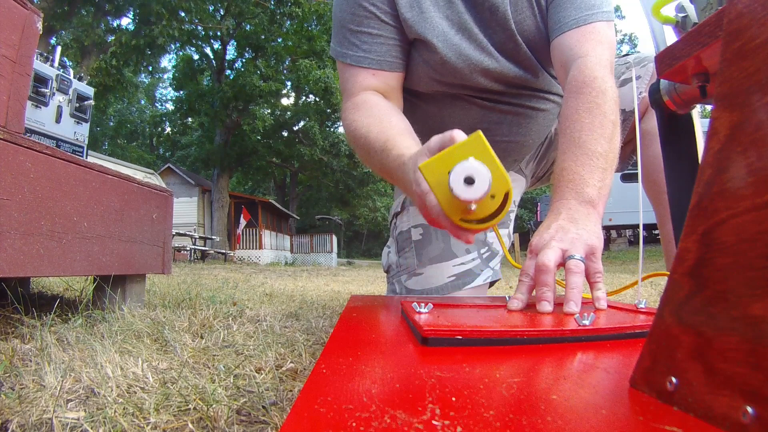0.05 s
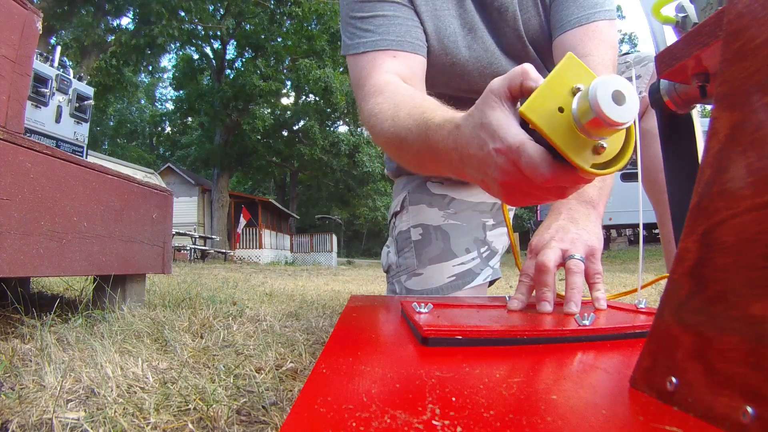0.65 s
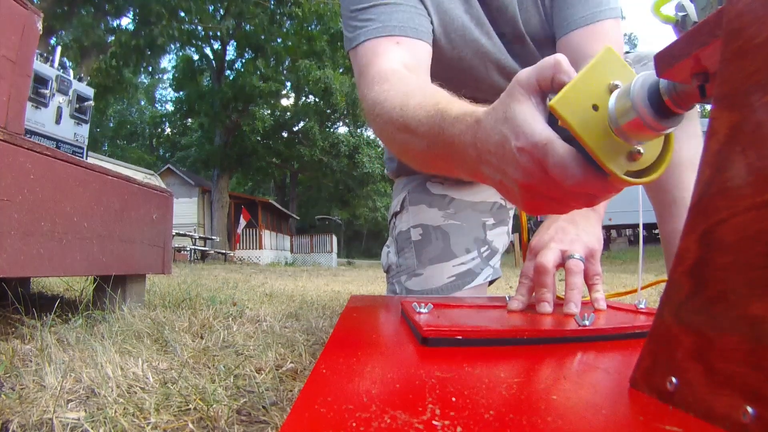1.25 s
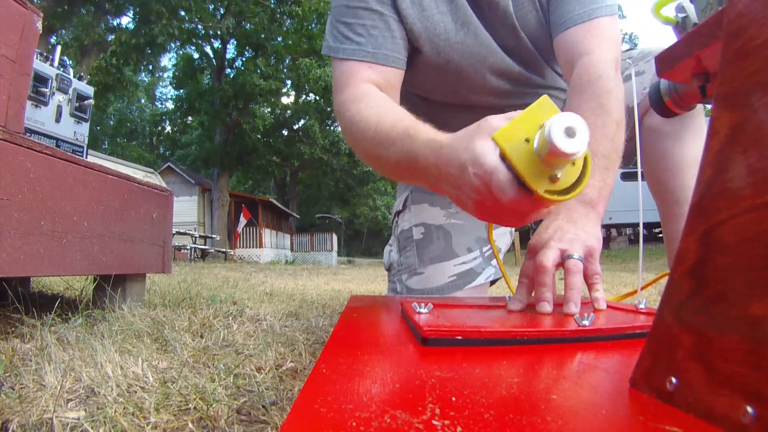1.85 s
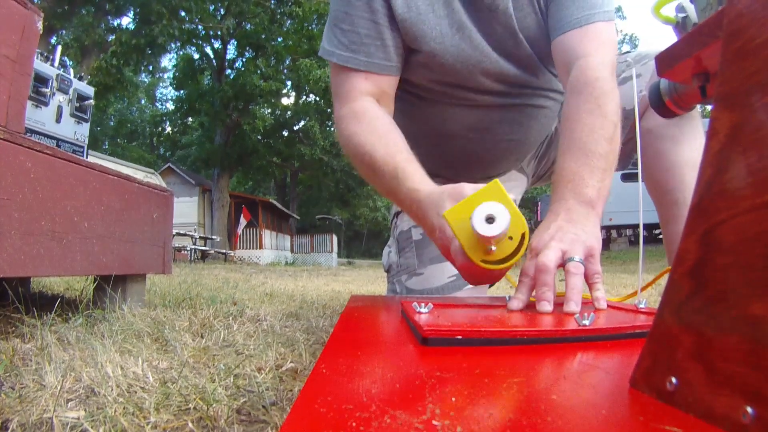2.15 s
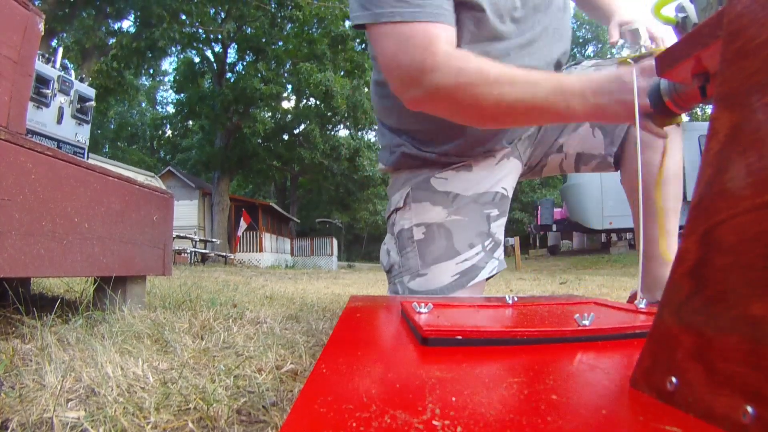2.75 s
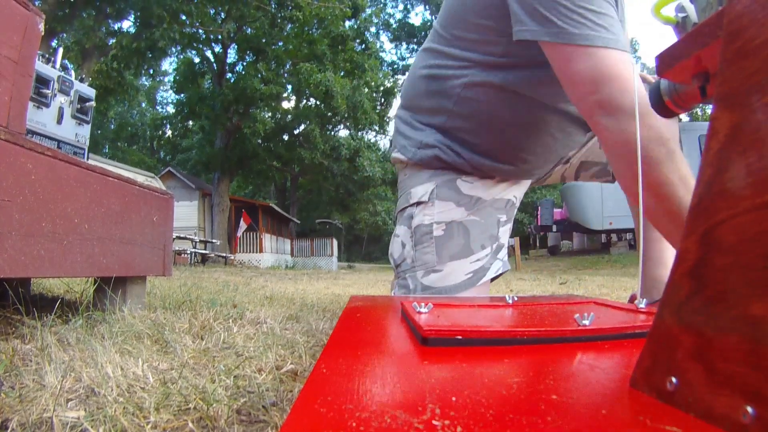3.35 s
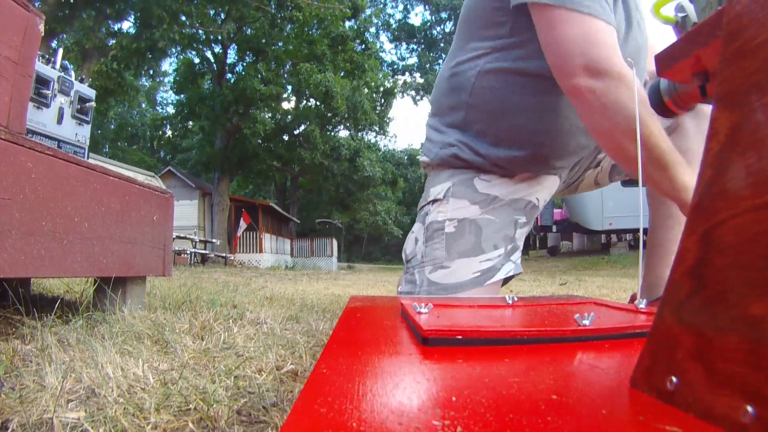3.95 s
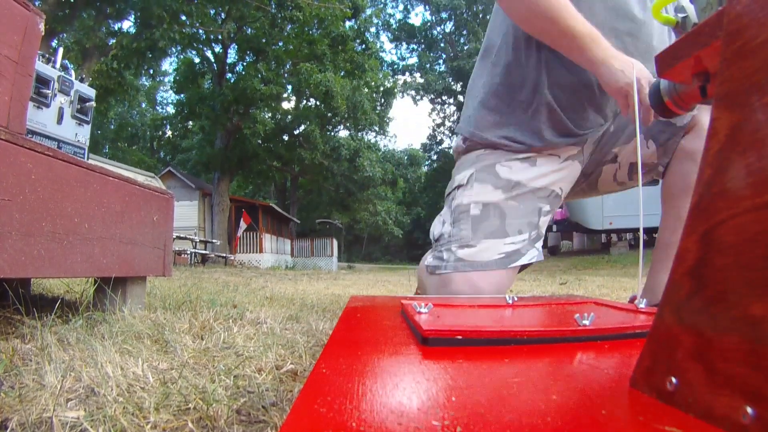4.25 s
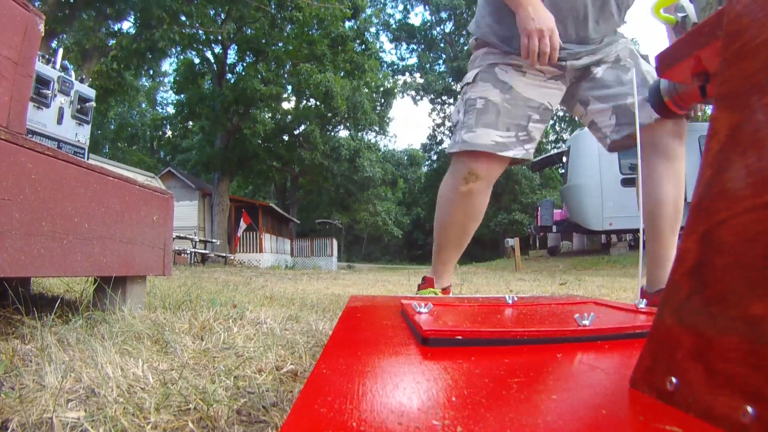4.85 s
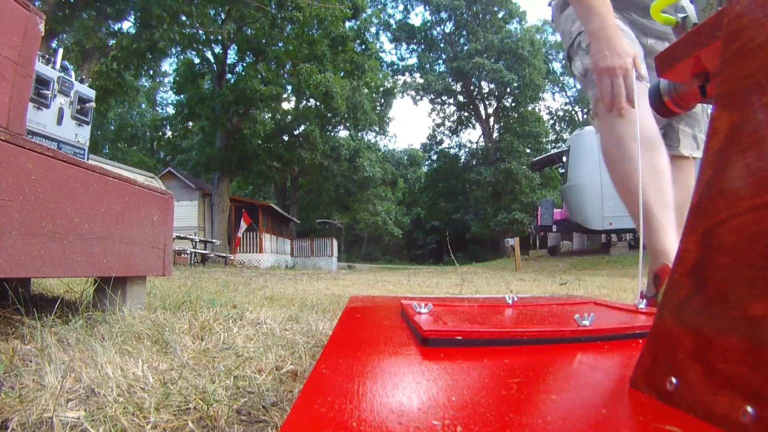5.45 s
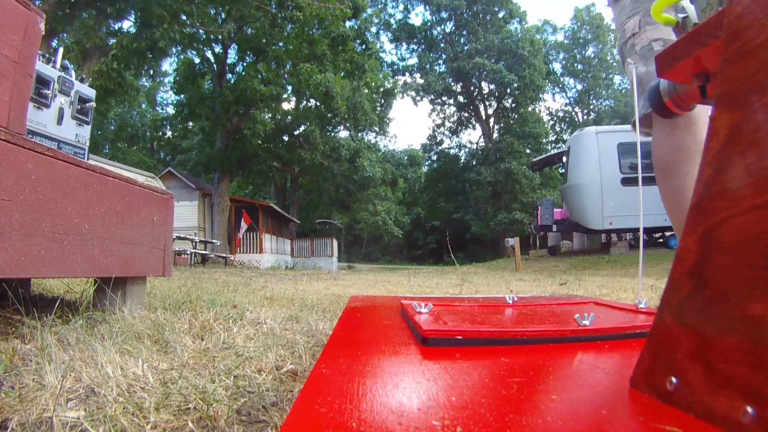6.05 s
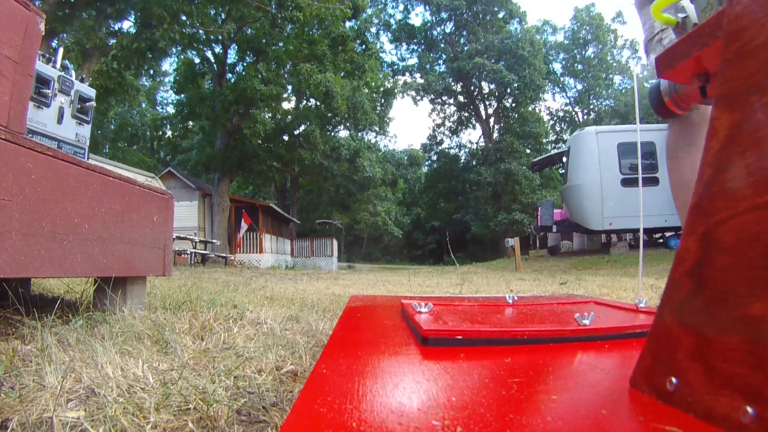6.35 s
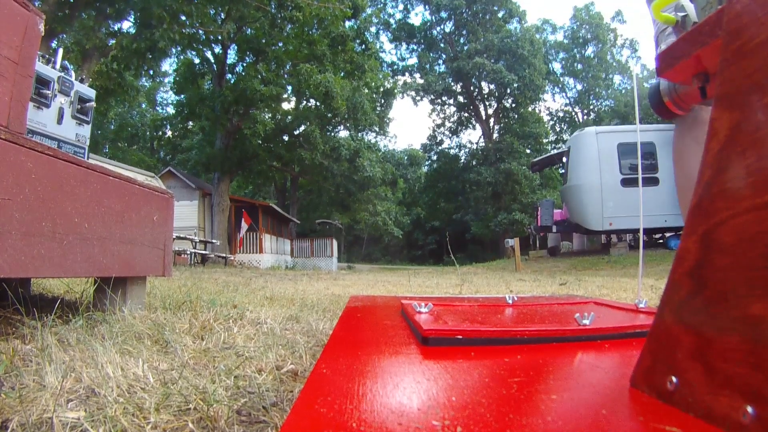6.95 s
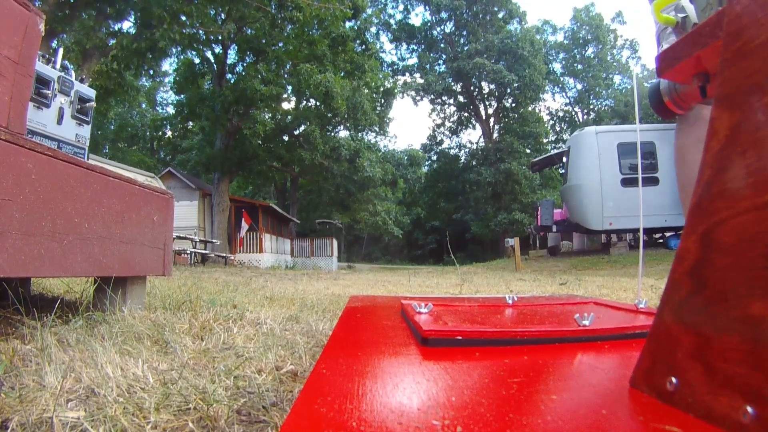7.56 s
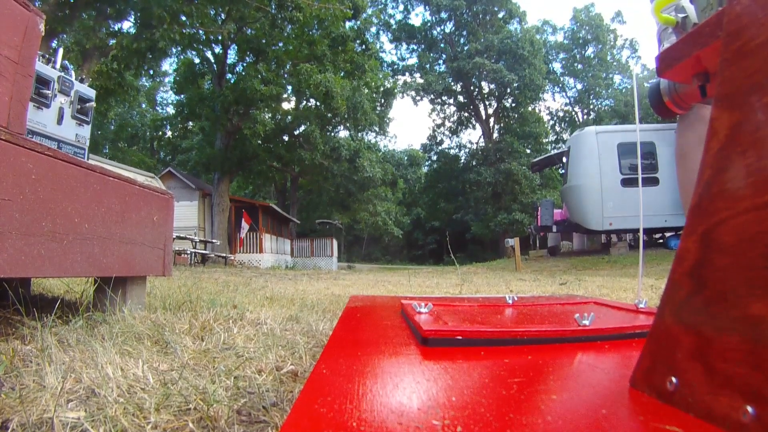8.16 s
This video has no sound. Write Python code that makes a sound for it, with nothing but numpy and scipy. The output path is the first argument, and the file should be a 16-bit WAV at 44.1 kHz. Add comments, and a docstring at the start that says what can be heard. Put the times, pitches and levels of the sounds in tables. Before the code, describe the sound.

A few knocks, a brief starter whir and thump, then a small two-stroke model boat engine revs loudly, rattling, and drops to a sputtering idle.

```python
"""A model boat's two-stroke engine is started on a lawn, with the microphone on the hull.
First, knocks excite the modes of the deck. An electric starter whirs, then grabs with a thump.
The engine catches and revs up: exhaust pulses drive the silencer's resonances, while piston knocks
and a chattering metal fitting shake the hull and overload the microphone.
Finally the engine sags to a stumbling idle, its rich mixture burning unevenly."""
import sys
import numpy as np
from scipy import signal
from scipy.fft import rfft, irfft
from scipy.io import wavfile
from scipy.ndimage import uniform_filter1d

SR = 44100
rng = np.random.default_rng(int(sys.argv[2]) if len(sys.argv) > 2 else 0)


def transcribe(signal):
    """Save signal, clipped to [-1, 1], as a 16-bit WAV file at the path in sys.argv[1]."""
    frames = np.atleast_2d(signal).T
    limited = np.clip(frames, -1, 1)
    pcm = np.round(limited * 32767).astype(np.int16)
    wavfile.write(sys.argv[1], SR, pcm)


N = 362061
TIME = np.arange(N) / SR

# Spectra of breeze, starter and heaving hull. Each row: frequency in Hz, relative density in dB.
BREEZE_SPECTRUM = [(20, -28), (50, 3), (100, -18), (200, -18.5), (500, -26), (1500, -31.5), (4000, -30.5),
                   (15000, -37.5)]
WHIR_SPECTRUM = [(200, -5.5), (1500, -21), (1900, -9), (2850, -10), (3080, 1.5), (3300, -11), (4100, -20),
                 (5000, -22), (7000, -18), (15000, -23)]
THUMP_SPECTRUM = [(20, -32), (45, 6.5), (90, -4), (170, 1), (350, -1), (550, -18), (1000, -27), (3000, -50)]
# Blows on the boat. Each row: start in seconds, relative level in dB, hardness as a cutoff in Hz.
BLOWS = [(0.001, -5.5, 430), (0.2389, -4, 2600), (0.2414, -8.5, 2600), (.247, -9, 1800), (.275, -28, 3000),
         (.287, -22, 2500), (0.5451, -7, 4800), (.553, -25, 2350)]
# Modes of the deck. Each row: frequency in Hz, gain in dB, time to decay by 60 dB in seconds.
DECK_MODES = [(180, -20.5, 0.11), (270, -30, 0.14), (424, -20, 0.12), (482, -19.5, 0.15), (590, -21.5, .16),
              (720, -28, 0.048), (895, -24, 0.087), (1120, -30, 0.075), (1390, -11, 0.03),
              (1530, -18, 0.073), (1650, -21, 0.083), (1900, -22, 0.047), (2100, -33, 0.18),
              (2495, -9.5, 0.053), (2740, -16, 0.11), (2830, -10, 0.031), (3310, -10.5, 0.021),
              (3580, -18, 0.032)]
# Resonances of three parts. Each row: frequency in Hz, bandwidth in Hz, gain in dB.
HULL_MODES = [(623, 55, -1), (800, 165, -6), (1155.3, 20.3, 10.5), (1378, 158, 4.5), (1540, 17, 1),
              (1749, 205, 8.5), (2320, 116, -3.5), (2693, 76, 10), (2990, 177, 16), (3186, 36, 11.5)]
FITTING_MODES = [(1400, 300, -2), (2108, 60, 6), (2600, 350, 3), (3760, 220, -3), (4400, 400, -11),
                 (4960, 210, -2), (5700, 600, -12)]
SILENCER_MODES = [(148, 156, -0.5), (225.6, 12, 5), (314.3, 47, -1), (403.3, 36, -1.5), (430.8, 21.3, 1.5)]
# Partials of the starter's gears. Each row: multiple of the motor's speed, relative level in dB.
GEAR_PARTIALS = [(16, -10), (26, -3), (30, -11), (35, -14), (59, -15)]
# Jolts of the hull: the starter grabbing, then one strong knock at 1.314 s once the engine runs. Each row:
# start in seconds, thump in dB, crunch in dB, decay in seconds.
HULL_JOLTS = [(1.087, -22.5, -26.5, 0.021), (1.101, -19, -24, 0.0077), (1.112, -7, -21, 0.012),
              (1.119, -12, -8.5, 0.0067), (1.129, -10, -12.5, 0.025), (1.157, -8, -6, 0.013),
              (1.176, 4.5, 7, 0.016), (1.314, -10, -11.5, 0.015)]
# Loud rattles of the fitting. Each row: time of the peak in seconds, relative level in dB.
LOUD_RATTLES = [(1.549, -25.5), (1.594, -26), (1.933, -27), (2.196, -25), (2.414, -15), (2.48, -16),
                (2.676, -21), (2.824, -19.5), (3.077, -13.5), (4.333, -18.5), (4.417, -21), (4.583, -20),
                (4.644, -20), (4.716, -25.5), (4.869, -23.5), (5.627, -23), (5.908, -22.5), (6.516, -27),
                (6.848, -32), (7.147, -24), (7.24, -24.5)]
# Response of the exhaust pipe to even firing. Each row: frequency in Hz, gain in dB.
PIPE_RESPONSE = [(110, 4), (166, 3), (198, -16), (243, 2.5), (268, -14.5), (290, -1.5), (330, 3.5),
                 (385, -3), (425, 1), (465, -21.5), (580, -13.5), (720, -49)]
# Rotation of the crankshaft. Each row: time in seconds, speed in turns per second.
CRANK_SPEED = [(1.25, 48.8), (1.38, 66.3), (1.52, 82.1), (1.64, 81.3), (2.1, 97.1), (2.49, 99.9),
               (2.72, 94.3), (3.15, 97.7), (3.42, 93.6), (4.54, 88.4), (5.0, 84.1), (6.32, 78.4),
               (6.48, 80.3), (6.65, 77.8), (7.29, 82.2), (7.93, 75.3), (8.06, 77.6), (8.2, 76.0)]
# Effort of the engine. Each row: time in seconds, relative exhaust level in dB.
EXHAUST_EFFORT = [(1.25, -24.5), (1.45, -20.5), (1.62, -18), (1.7, -18.5), (1.83, -13.0), (2.1, -12.5),
                  (4.1, -14), (5.48, -14.5), (5.66, -23.5), (5.93, -19.5), (6.3, -22.5), (6.48, -20.5),
                  (6.8, -24.5), (7.03, -22), (7.2, -16.5), (7.46, -19.5), (7.72, -24), (8.2, -25.5)]
# Rich mixture. Each row: time in seconds, share of the charge left unburnt on a weak turn.
UNBURNT_SHARE = [(1.2, 0.47), (1.64, .6), (1.72, 0.19), (2.3, 0.3), (5.47, 0.4), (5.58, 0.71), (6.6, 0.81),
                 (7.25, 0.53), (8.2, 0.75)]


def from_db(db):
    return 10 ** (np.asarray(db) / 20)


def unit_rms(x):
    return x / np.sqrt(np.mean(x ** 2) + 1e-20)


def noise():
    return rng.standard_normal(N)


def curve(rows):
    return np.interp(TIME, *np.transpose(rows))


def low_pass(x, hz, order=2):
    return signal.sosfilt(signal.butter(order, hz, fs=SR, output="sos"), x + 1e-18)


def colour(x, spectrum):
    """Spectral shaping: weights each frequency, then scales to an rms of 1."""
    hz, db = np.transpose(spectrum)
    bin_hz = np.maximum(np.arange(N // 2 + 1) * SR / N, 1)
    gain = from_db(np.interp(np.log(bin_hz), np.log(hz), db))
    return unit_rms(irfft(rfft(x) * gain, N))


def resonate(x, modes, ratio=1):
    """Superposition of resonators, the k-th weighted by ratio ** k; a negative ratio alternates signs."""
    out = 0
    for k, (hz, width, db) in enumerate(modes):
        r = np.exp(-np.pi * width / SR)
        poles = [1, -2 * r * np.cos(2 * np.pi * hz / SR), r * r]
        gain = ratio ** k * from_db(db) * (1 - r * r) / 2
        out += gain * signal.lfilter([1, 0, -1], poles, x + 1e-18)
    return out


def levelled(x, window=6000):
    """Normalisation to a running rms near 1; single strokes keep their differences."""
    power = uniform_filter1d(uniform_filter1d(x * x, window), window)
    return x / np.sqrt(np.abs(power) + 1e-3 * np.mean(x * x))


def impulses(at, sizes):
    """Ideal impacts, one sample long, at the given seconds."""
    return np.bincount(np.clip(np.asarray(at) * SR, 0, N).astype(int), sizes, N + 1)[:N]


def decay(x, decay_s):
    """Damping: each impulse dies away exponentially."""
    return signal.lfilter([1], [1, -np.exp(-1 / (decay_s * SR))], x + 1e-18)


def breeze(level_db=-49):
    """Turbulence: lightly moving air gives broadband noise, strongest in the bass."""
    return from_db(level_db) * colour(noise(), BREEZE_SPECTRUM)


def knocks(ring_db=1, crack_db=-11, crack_s=0.009):
    """Impact excitation: each blow sets the deck's modes ringing; harder blows also crack more."""
    force = sum(low_pass(impulses([s], from_db([db])), hz, order=1) for s, db, hz in BLOWS)
    ringing = 0
    for k, (hz, db, t60) in enumerate(DECK_MODES):
        r, w = from_db(-60 / (t60 * SR)), 2 * np.pi * hz / SR
        mode = signal.lfilter([0, np.sin(w)], [1, -2 * r * np.cos(w), r * r], force)
        ringing += (-1) ** k * from_db(db) * mode
    at, blow_db, hardness = np.transpose(BLOWS)
    edges = impulses(at, from_db(blow_db) * hardness / hardness.max())
    roughness = unit_rms(low_pass(resonate(noise(), HULL_MODES + SILENCER_MODES), hz=3100, order=6))
    crack = decay(edges, crack_s) * roughness
    return low_pass(from_db(ring_db) * ringing + from_db(crack_db) * crack, hz=3900, order=4)


def starter(on_s=0.54, off_s=1.2, spin_up_s=0.06, top_hz=120, gain_db=-46.5, brush_db=3):
    """Periodic contact: commutator ticks and gear whine rise with motor speed, over the brushes' hiss."""
    speed_share = 1 - np.exp(-np.maximum(TIME - on_s, 0) / spin_up_s)
    waver = 1 + 0.0052 * unit_rms(low_pass(noise(), hz=12))
    turns = np.cumsum(top_hz * speed_share * waver) / SR
    ticks = np.diff(np.floor(turns), prepend=0)
    whir = colour(unit_rms(ticks - ticks.mean()) + from_db(brush_db) * noise(), WHIR_SPECTRUM)
    whine = sum(from_db(db) * np.sin(2 * np.pi * multiple * turns) for multiple, db in GEAR_PARTIALS)
    envelope = (TIME < off_s) * speed_share ** 8.9
    return from_db(gain_db) * envelope * (whir + whine)


def jolts():
    """Shock excitation: as the starter grabs, the hull heaves and its parts crunch together; one more strong
    knock follows once the engine runs."""
    heave = sum(decay(impulses([s], from_db([db])), decay_s) for s, db, _, decay_s in HULL_JOLTS)
    crunch = sum(decay(impulses([s], from_db([db])), decay_s) for s, _, db, decay_s in HULL_JOLTS)
    thump = low_pass(heave, hz=230) * colour(noise(), THUMP_SPECTRUM)
    hull_noise = unit_rms(low_pass(resonate(noise(), HULL_MODES, ratio=-1.055), hz=8400))
    return thump + crunch * hull_noise


def fitting(at, period, speed, cranking, loose_hz=89.77, range_hz=0.35, flares_per_s=26):
    """Contact rattle: a metal part bounces four times a turn, harder once speed shakes it loose."""
    loose = 0.5 + 0.5 * np.tanh((speed - loose_hz) / (2 * range_hz))
    chatter = from_db(-26 + 12 * loose - 8.5 * cranking)
    # Random flares while loose join the timed rattles; their bell-shaped swells add in power.
    flaring = rng.random(len(at)) < flares_per_s * period * np.interp(at, TIME, loose)
    flare_db = rng.normal(-26, 2, len(at))
    swell_gain_db, swell_s = 11, 0.014
    swell_power = 0
    for s, db in LOUD_RATTLES + list(zip(at[flaring], flare_db[flaring])):
        bell = np.exp(-np.minimum(((TIME - s) / swell_s) ** 2, 20))
        swell_power += (from_db(db + swell_gain_db) * bell) ** 2
    bounces = 0
    for _ in range(4):
        bounces += impulses(at + period * rng.random(len(at)), from_db(rng.normal(0, 3, len(at))))
    metal = resonate(decay(bounces, decay_s=0.002) * noise(), FITTING_MODES, ratio=-0.95)
    return (chatter + np.sqrt(swell_power)) * levelled(low_pass(metal, hz=6000, order=4), window=1000)


def crankcase(turns, shake_db=-16):
    """Volume displacement: air is pumped once a turn, fired or not, while the hull shakes."""
    return np.sqrt(2) * np.cos(2 * np.pi * turns) + from_db(shake_db) * colour(noise(), THUMP_SPECTRUM)


def piston(at, period, strengths, revving, lead_s=0.0016, contact_s=0.0009, snap_db=21, tick_db=-21):
    """Structure-borne sound: knocks at both ends of the stroke ring the hull, which buzzes with speed."""
    top_scatter, timing_scatter, bottom_scatter = rng.standard_normal((len(at), 3)).T
    top_at = at - lead_s  # the harder knock comes just ahead of the exhaust pop
    bottom_at = top_at + period * (0.66 + 0.01 * timing_scatter)
    top = impulses(top_at, strengths ** 0.45 * from_db(1.23 * top_scatter))
    bottom = impulses(bottom_at, from_db(-6 + 1.23 * bottom_scatter))
    buzz = from_db(-12 + 8 * revving)
    grit = (decay(top + bottom, contact_s) + buzz) * noise()
    snaps = from_db(snap_db) * (top * rng.choice([-1, 1], N) + bottom)
    hull = low_pass(resonate(snaps + grit, HULL_MODES), hz=3550, order=12)
    # The return stroke adds a thin metallic tick.
    tick_force = 2 * decay(bottom, contact_s) * noise() + 0.5 * grit
    tick = resonate(tick_force, modes=[(4000, 240, 21), (5450, 110, 16), (10100, 1900, -7)])
    return levelled(hull + from_db(tick_db) * tick)


def firing_strengths(unburnt, third_turn_chance=0.81, spread_db=1.5):
    """Cyclic variation: unburnt mixture gathers and fires hard every third turn, sometimes every second."""
    count = len(unburnt)
    strong_turns = np.cumsum(np.where(rng.random(count) < third_turn_chance, 3, 2))
    weak = ~np.isin(np.arange(count), strong_turns)
    return (1 - weak * unburnt) * from_db(rng.normal(0, spread_db, count))


def exhaust_drone(turns, speed):
    """Harmonic series: even firing sends crankshaft orders two to eight through the pipe's resonances."""
    hz, db = np.transpose(PIPE_RESPONSE)
    orders = np.arange(2, 9)[:, None]
    gains = from_db(np.interp(orders * speed, hz, db))
    return levelled(np.sum(gains * np.cos(2 * np.pi * orders * turns), axis=0))


def exhaust_sputter(at, strengths, jitter_s=0.0003, gas_db=-24, gas_s=0.0056):
    """Pulse excitation: uneven pops, each with a puff of turbulent gas, ring the silencer."""
    burn_at = at + rng.normal(0, jitter_s, len(at))  # a rich charge ignites at an uncertain moment
    pops = impulses(burn_at, strengths)
    gas = from_db(gas_db) * decay(pops, gas_s) * noise()
    silencer = resonate(pops + gas, SILENCER_MODES, ratio=-1.19)
    return levelled(low_pass(silencer, hz=520, order=6))


def engine(idle_hz=80, full_hz=100, caught_s=1.563, catch_s=0.2, drone_db=8, sputter_db=10.5):
    """Forced vibration: the crankshaft times every layer, and the mechanical ones grow with its speed."""
    speed, effort_db, unburnt = curve(CRANK_SPEED), curve(EXHAUST_EFFORT), curve(UNBURNT_SHARE)
    revving = np.clip((speed - idle_hz) / (full_hz - idle_hz), 0, 1)
    cranking = np.clip((caught_s - TIME) / catch_s, 0, 1)  # falls to 0 as the engine catches
    turns = np.cumsum(speed) / SR
    at = np.interp(np.arange(1, int(turns[-1])), turns, TIME)  # the second at which each turn ends
    period = 1 / np.interp(at, TIME, speed)
    strengths = firing_strengths(np.interp(at, TIME, unburnt))
    exhaust = from_db(drone_db) * (1 - unburnt) * exhaust_drone(turns, speed)
    exhaust += from_db(sputter_db) * unburnt * exhaust_sputter(at, strengths)
    crankcase_db = -17 + 7.5 * revving - 6 * cranking + 0.32 * (effort_db - effort_db.mean())
    piston_db = -12 + 3.5 * revving - 8.5 * cranking
    sound = from_db(effort_db) * exhaust
    sound += from_db(crankcase_db) * crankcase(turns)
    sound += from_db(piston_db) * piston(at, period, strengths, revving)
    sound += fitting(at, period, speed, cranking)
    fade_in = np.interp(TIME, [1.11, 1.2], [0, 1])
    return fade_in * sound


def scene():
    """Superposition: the boat's sounds and the breeze add in one channel."""
    return (knocks() + starter() + jolts() + engine() + breeze())[None]


def record(dry, knee=16, ceiling_db=-6.5, attack_s=0.03, release_db_per_s=10, cutoff_hz=15700):
    """Saturation and compression: the input clips, then a slow gain control turns the peaks down."""
    clipped = dry / (1 + dry ** knee) ** (1 / knee)
    over_db = np.maximum(20 * np.log10(np.abs(clipped) + 1e-9) - ceiling_db, 0)
    release_db = release_db_per_s * TIME
    held_db = np.maximum.accumulate(over_db + release_db, axis=1) - release_db
    reduction_db = decay(held_db, attack_s) / (attack_s * SR)
    band_limit = signal.ellip(10, 0.1, 80, cutoff_hz, fs=SR, output="sos")
    return signal.sosfilt(band_limit, clipped * from_db(-reduction_db))


dry = scene()
out = record(dry)
transcribe(out)
```